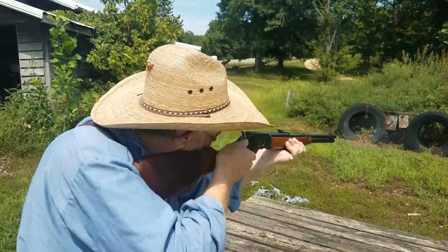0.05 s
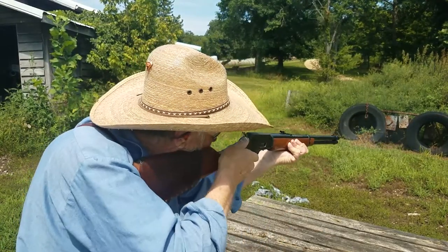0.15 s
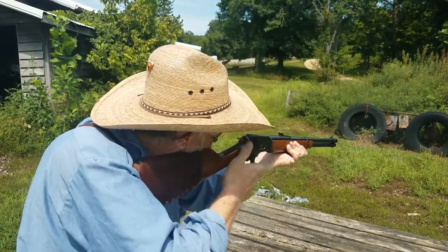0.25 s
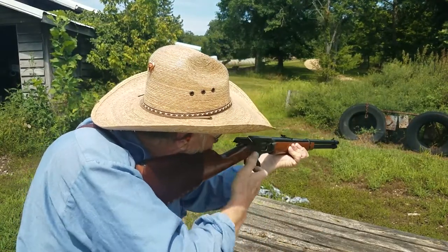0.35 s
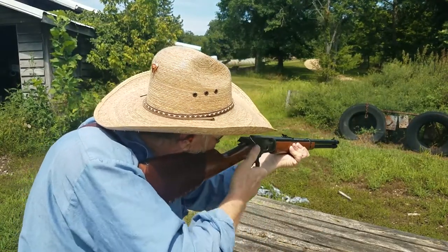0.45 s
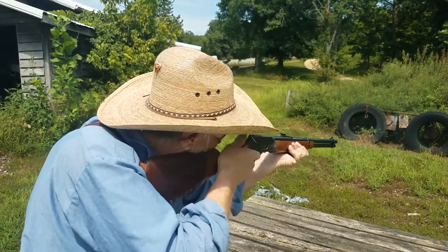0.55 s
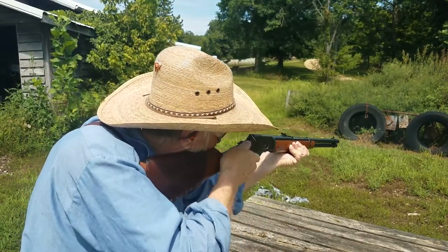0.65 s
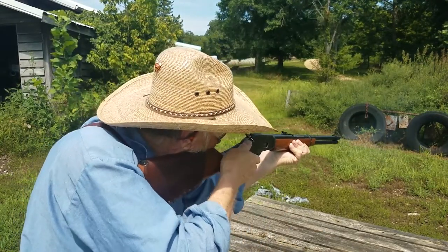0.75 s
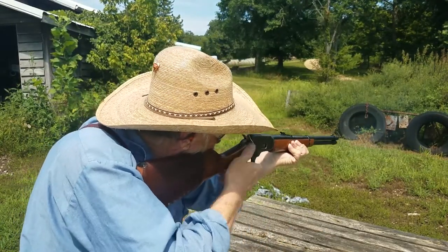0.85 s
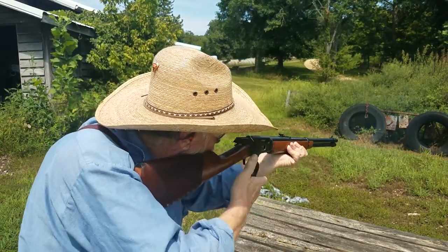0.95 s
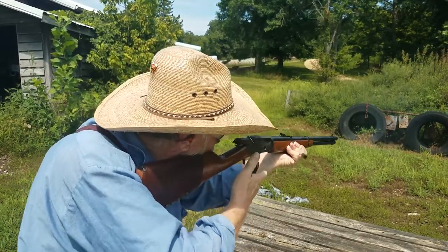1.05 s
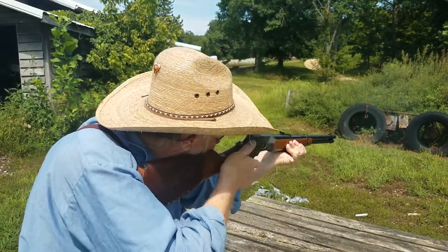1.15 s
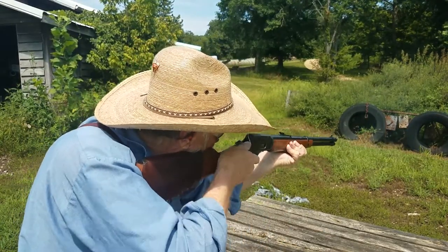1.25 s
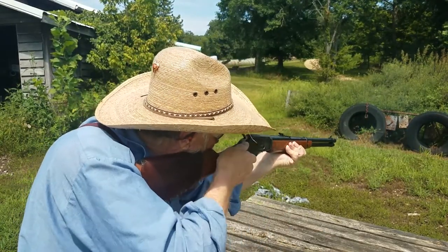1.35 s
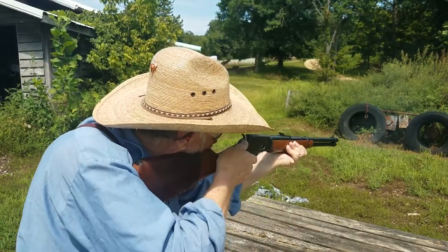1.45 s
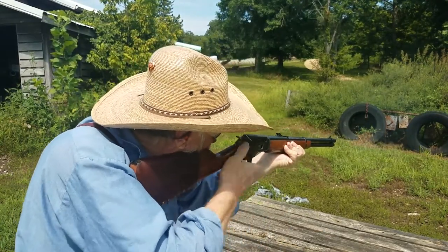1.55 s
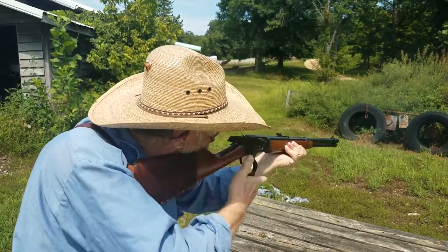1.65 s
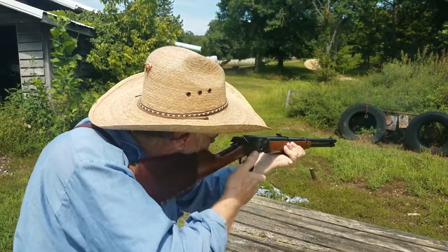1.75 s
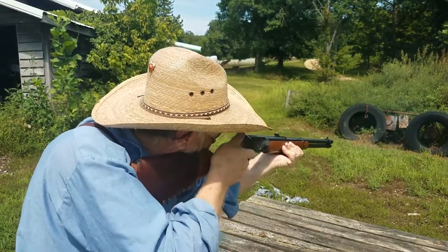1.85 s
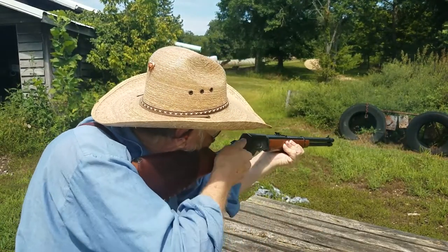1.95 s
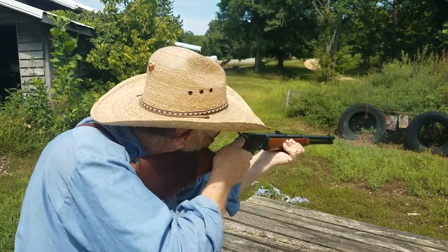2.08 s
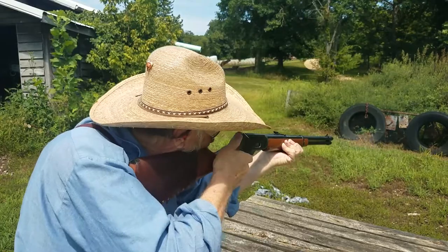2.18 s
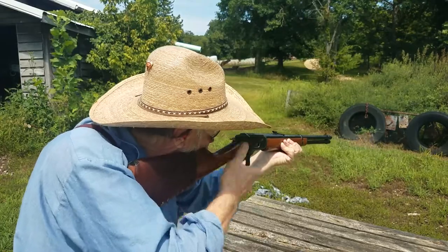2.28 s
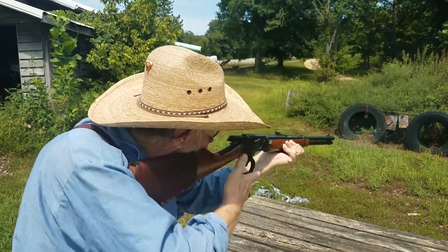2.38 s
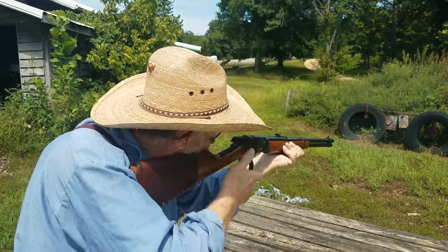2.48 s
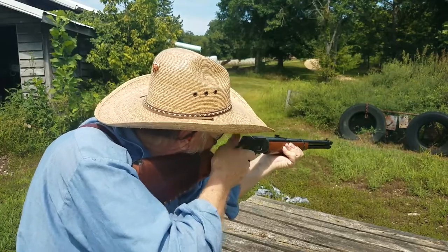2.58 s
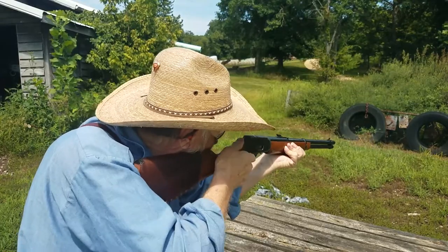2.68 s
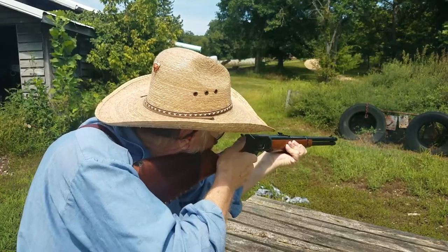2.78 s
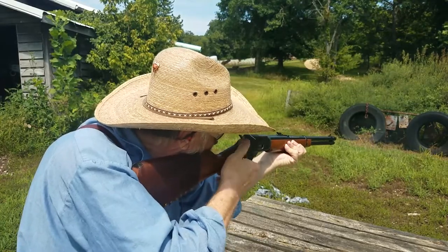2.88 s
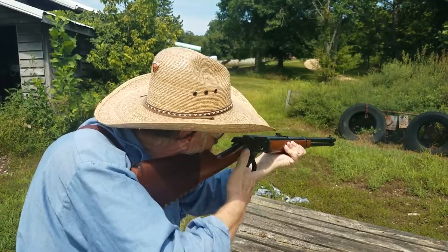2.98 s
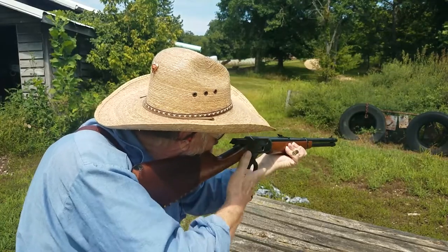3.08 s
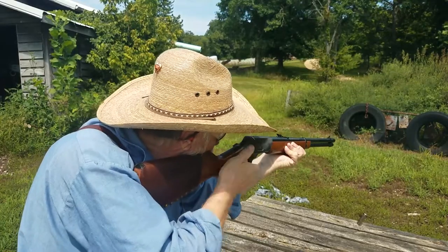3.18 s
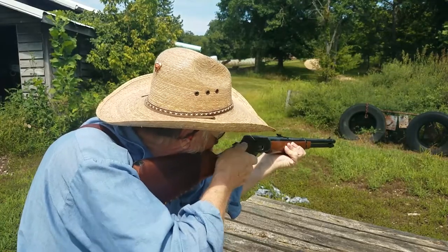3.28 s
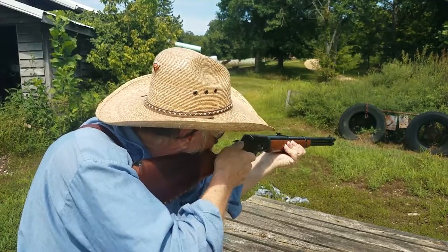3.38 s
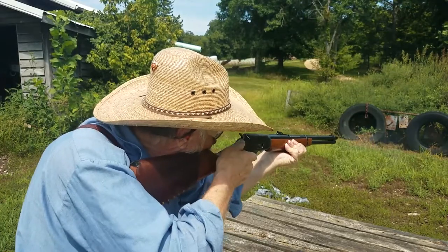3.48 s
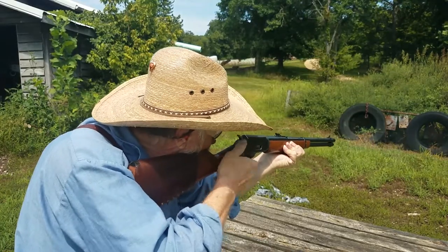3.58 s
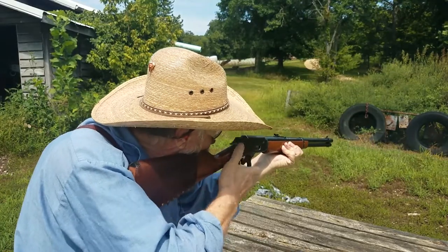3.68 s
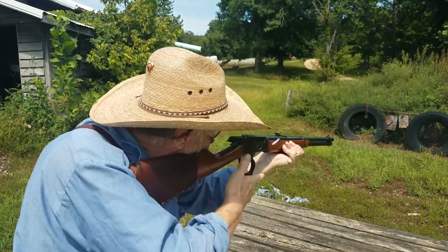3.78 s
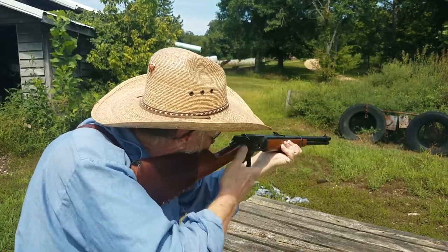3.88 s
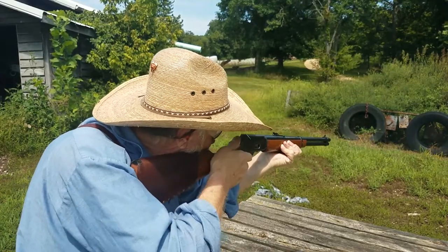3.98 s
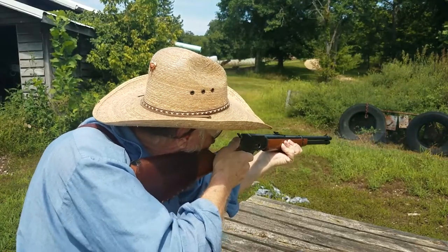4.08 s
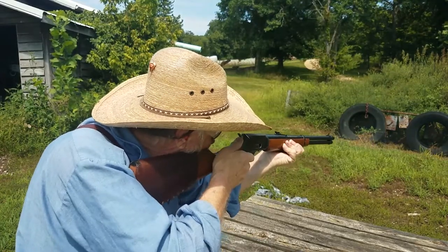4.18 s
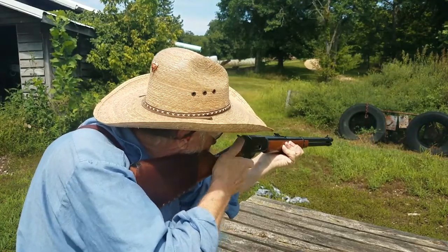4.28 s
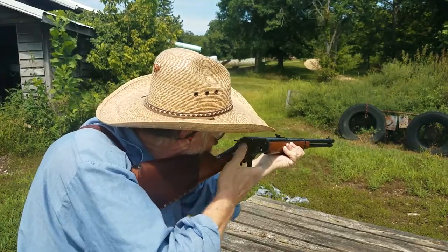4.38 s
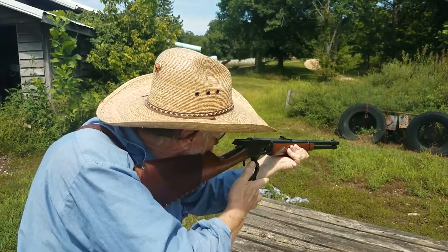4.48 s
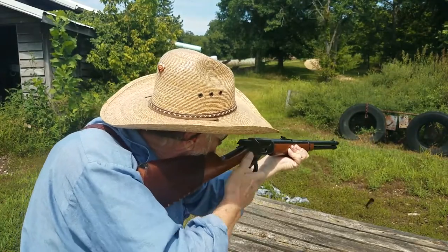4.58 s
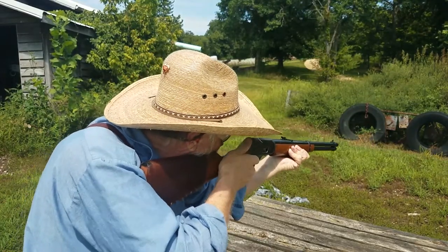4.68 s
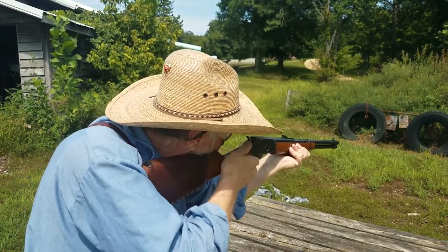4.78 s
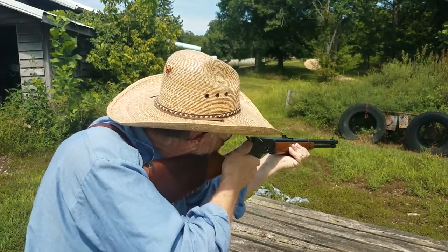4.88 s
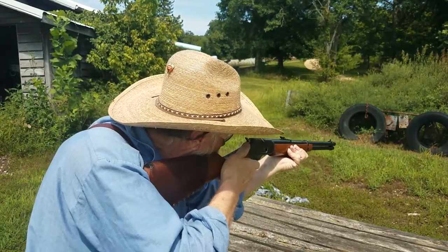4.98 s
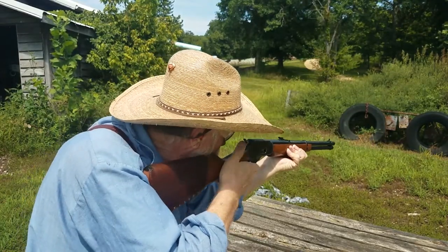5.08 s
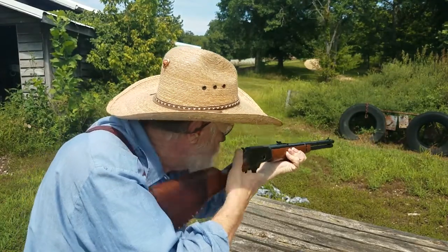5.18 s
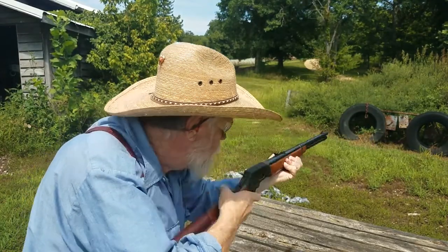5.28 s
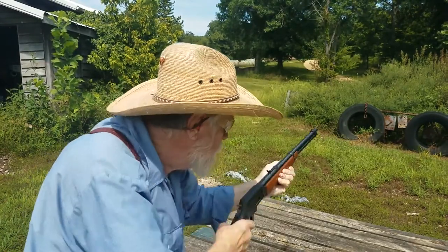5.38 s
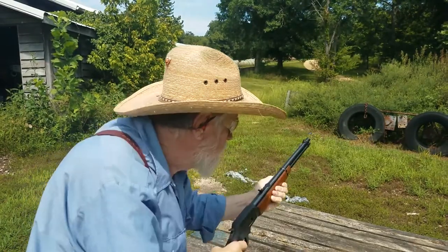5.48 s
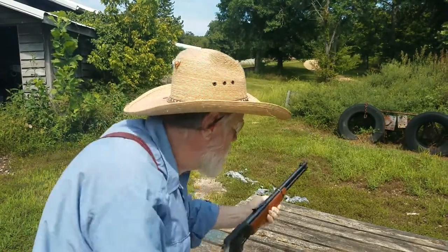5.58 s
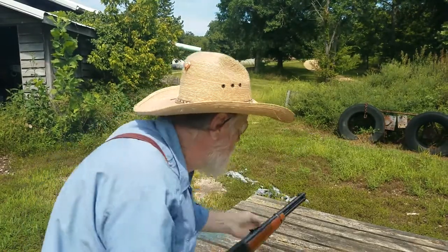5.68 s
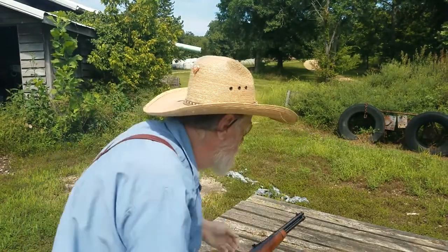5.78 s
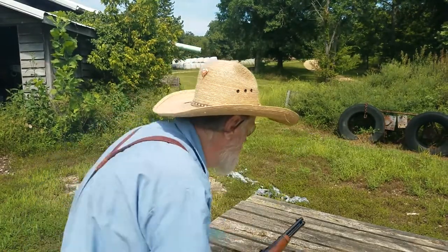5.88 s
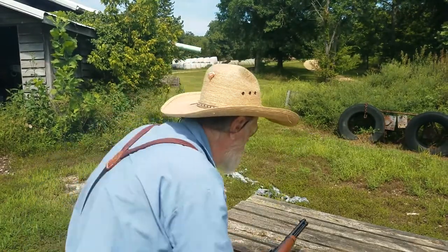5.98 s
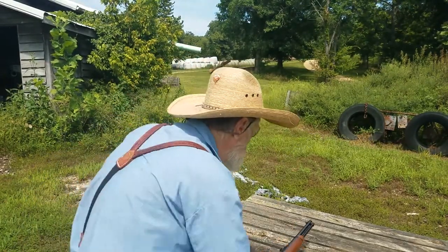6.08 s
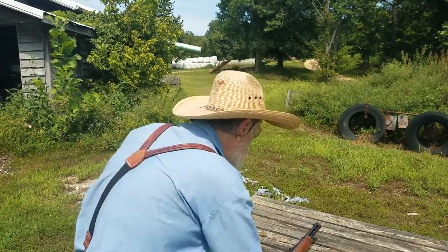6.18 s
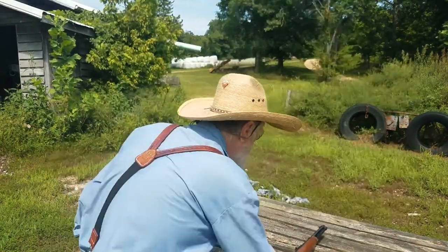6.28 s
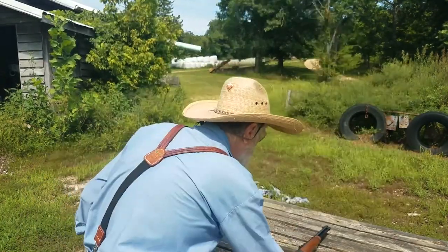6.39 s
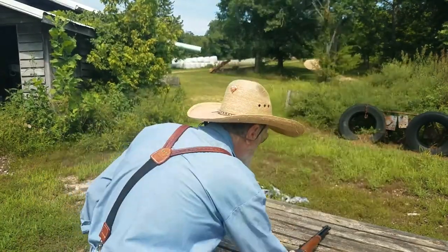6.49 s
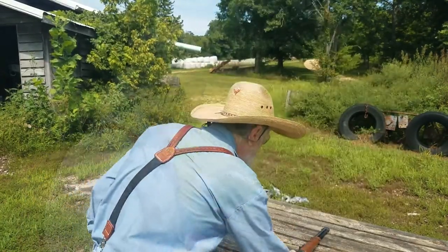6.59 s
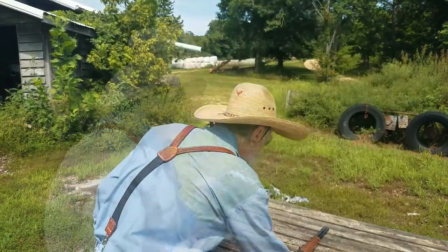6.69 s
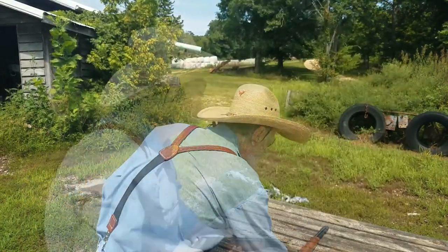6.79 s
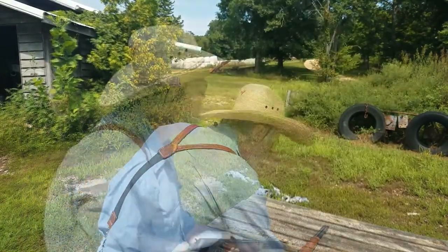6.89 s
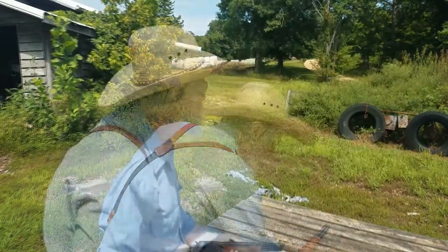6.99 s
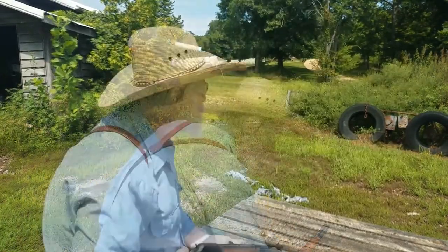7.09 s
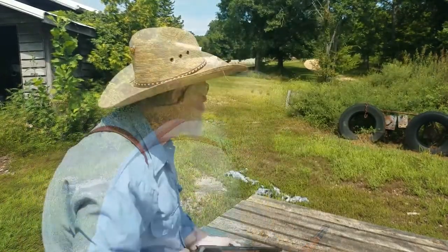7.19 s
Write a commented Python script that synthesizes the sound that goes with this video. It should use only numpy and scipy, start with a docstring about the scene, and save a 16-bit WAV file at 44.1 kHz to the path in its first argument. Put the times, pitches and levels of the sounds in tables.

```python
"""Lever-action rifle and steel plate

On a summer range seven shots strike a steel plate, then the hammer snaps on an empty chamber and
the rifle is laid on a table. Blasts, wall slaps and tree tails are decaying noise bands with low
pulses; plate and receiver are ringing modes; action contacts, insects and wind are shaped noise, the
far motor sines. Right port faces the scene, left is nearly covered; limiting and clipping act on both."""
import sys
import numpy as np
from scipy import signal
from scipy.fft import rfft, irfft, next_fast_len
from scipy.io import wavfile

SR = 44100
rng = np.random.default_rng(int(sys.argv[2]) if len(sys.argv) > 2 else 0)


def generate_wav(sig):
    """Save sig (samples, or channels by samples) to the path in sys.argv[1] as 16-bit PCM at SR."""
    pcm = np.round(np.clip(np.atleast_2d(sig).T, -1, 1) * 32767).astype(np.int16)
    wavfile.write(sys.argv[1], SR, pcm)


N = 319725


def amp(db):
    """Gain of a level in dB."""
    return 10 ** (np.asarray(db) / 20)


def at_hz(points, hz, axis=1):
    """Table column interpolated on a log-frequency axis."""
    points = np.array(points)
    return np.interp(np.log(hz), np.log(points[:, 0]), points[:, axis])


def coloured(x, points):
    """Filter by a (frequency [Hz], gain [dB]) curve."""
    size = next_fast_len(N)
    hz = np.arange(size // 2 + 1) * SR / size + 1
    return irfft(rfft(x, size) * amp(at_hz(points, hz)), size)[:N]


def noise(points):
    """Coloured noise of rms 1."""
    x = coloured(rng.standard_normal(N), points)
    return x / x.std()


def drift(rate_hz):
    """Random points of spread 1, rate_hz per second, joined by lines."""
    points = rng.standard_normal(int(N / SR * 400))
    return np.interp(np.arange(N) / SR * rate_hz, np.arange(len(points)), points)


def clicks(times_s, sizes):
    """Click train."""
    out = np.zeros(N) + 1e-18
    np.add.at(out, (np.asarray(times_s) * SR).astype(int), sizes)
    return out


def fall(x, t60_s):
    """Each click starts an exponential decay."""
    return signal.lfilter([1], [1, -amp(-60 / (t60_s * SR))], x)


def ring(x, hz, t60_s):
    """Two-pole resonator: a unit click starts a decaying sine of height 1."""
    r, w = amp(-60 / (t60_s * SR)), 2 * np.pi * hz / SR
    return signal.lfilter([0, np.sin(w)], [1, -2 * r * np.cos(w), r * r], x)


# Background rise after firing, sinking at the close: (time [s], relative level [dB])
RISE = [(4.68, -19), (4.78, -12), (4.9, -15), (5.25, -15), (5.6, -3), (5.8, -1.5), (6.9, -1.5), (7.1, -6.5),
        (7.25, -10)]
# Cicada, two swells: (time [s], relative level [dB])
SWELLS = [(4.68, -73), (4.9, -56), (5.45, -49), (5.94, -38.5), (6.1, -38.5), (6.3, -48), (6.46, -47.5),
          (6.8, -36), (6.94, -39), (7.1, -46)]
# Slow beats at the start of each swell: (first beat [s], beats [count], relative level [dB])
SWELL_STARTS = [(5.444, 4, -46), (6.39, 6, -38)]
# Cicada spectrum: (frequency [Hz], relative density [dB per Hz])
CICADA = [(5410, -33), (9200, -11), (9840, -16.5), (11000, -5.5), (12800, -3), (15100, 0), (16000, -4)]
# Motor harmonics: (frequency [Hz], relative level [dB])
MOTOR = [(145.3, 3.5), (290.7, -11.5), (436, -23), (581.4, -18.5)]
# Air noise: (time [s], relative level [dB])
AIR_LEVEL = [(4.7, -52), (5.5, -51.5), (6.9, -49), (7.05, -51.5)]
# Air spectrum: (frequency [Hz], relative density [dB per Hz])
AIR = [(88, -27.5), (150, -5.5), (368, -12.5), (1940, -24), (6510, -26.5), (7920, -16.5), (9630, -29.5),
       (12900, -14.5), (16000, -12.5)]
WIND_REL_DB, CRICKET_REL_DB, MOTOR_REL_DB = -47.5, -51, -49
HUM_WAVER_DB, BEAT_S = 3, .0495
RUSTLE_S, RUSTLE_WIDTH_S, RUSTLE_REL_DB = 7.03, 0.077, -54.5


def field():
    """Wind and air noise, motor harmonics, crickets as sliding tone bursts, cicada as pulsed noise."""
    time = np.arange(N) / SR
    rise = amp(np.interp(time, *np.transpose(RISE)))
    swell = amp(np.interp(time, *np.transpose(SWELLS)))

    gusts = noise([(20, -19.5), (50, -6.5), (120, -8.5), (300, -31), (1000, -46.5), (3000, -76)])
    gusts = gusts * amp(2.0 + 3.3 * drift(11))
    hum = sum(amp(db + HUM_WAVER_DB * drift(20)) * np.sin(2 * np.pi * hz * time) for hz, db in MOTOR)

    chirps = 0
    for rate_hz, db in ((55, 8.0), (82, -14)):
        turn = (rate_hz * time + 0.042 * drift(14)) % 1
        pitch_hz = 7950 - 1900 * (turn - .5)   # every chirp slides down
        stroke = np.exp(-((turn - .5) / .13) ** 2)
        tone = np.sin(2 * np.pi * np.cumsum(pitch_hz) / SR)
        chirps = chirps + amp(db + 3.5 * drift(24)) * stroke * tone
    chorus = noise([(6600, -24.0), (7400, -6.5), (8000, -2.5), (8600, -12.5), (9500, -42.5)])
    crickets = 1.3 * chirps + 0.91 * chorus

    beat_clicks = sum(clicks(s + BEAT_S * np.arange(round(count)), amp(db))
                      for s, count, db in SWELL_STARTS)
    beats = fall(beat_clicks, 0.046)
    pulsing = amp(2.5 * np.sin(2 * np.pi * 59 * time + drift(6)))
    cicada = noise(CICADA) * (swell * pulsing + beats)

    rustle_shape = np.exp(-((time - RUSTLE_S) / RUSTLE_WIDTH_S) ** 2)
    rustle = amp(RUSTLE_REL_DB + 2.4 * drift(70)) * rustle_shape
    rustle = rustle * noise([(1500, -15), (4000, -7), (5500, -1), (8000, -20)])
    air = amp(np.interp(time, *np.transpose(AIR_LEVEL))) * noise(AIR)

    risen = rise * (amp(WIND_REL_DB) * gusts + amp(MOTOR_REL_DB) * hum + amp(CRICKET_REL_DB) * crickets)
    return 2 * (risen + cicada + rustle + air)


# Shots and where each bullet lands: (time [s], plate clang delay [s], low thud delay [s],
# ring length factor [1], relative start levels of eight leading plate modes [dB] x 8)
SHOTS = [(0.0121, 0.063, .204, 1.01, -6, -3, -7.5, -10.5, -8.5, -8, -25, -5.5),
         (0.6615, 0.055, 0.18, .69, -18, -1.5, -9.5, -7.5, -10.5, -11, -11, 3),
         (1.3381, 0.057, 0.15, 0.75, -21, 1, -10, -8, -32, -8, -8, -23),
         (1.9911, 0.055, .187, 0.81, -19.5, 0.5, -19, -12.5, -10, -4, -19, -11),
         (2.681, .0578, .16, 0.69, -10.5, 1.6, -18.5, -12, -22.5, -22.5, -20, 4),
         (3.3789, 0.064, .243, 1.016, -13.5, 3.5, -18, -2, -12.5, -16, -7, -17),
         (4.0502, 0.062, 0.17, .79, -11.5, 3, -23, -24.5, -11, -3.5, -8.5, -22)]
# Blast repeats off table, ground, shed corner: (delay [s], relative level [dB])
BOUNCES = [(.0045, 0.5), (.009, -1.5), (.014, -5), (.017, -6)]
# Decaying noise of blast, bullet splash, trees:
# (frequency [Hz], relative start density [dB per Hz], t60 [s])
BLAST = [(60, -39, 0.04), (198, -32, 0.033), (700, -33.5, 0.035), (1520, -36.5, 0.046), (3720, -50, 0.044),
         (8352, -50, 0.053), (15000, -51.5, 0.074)]
SPLASH = [(60, -33.5, 0.06), (200, -29.5, 0.11), (690, -38, 0.078), (1460, -34, 0.084), (4000, -47.5, 0.14),
          (9310, -61, 0.38), (15000, -53, 0.39)]
TREES = [(60, -52.5, 0.44), (200, -58.5, 0.88), (750, -56, 2.53), (1390, -48.5, 1.31), (4000, -52.5, 0.93),
         (8600, -57, 0.89), (15000, -62, 0.29)]
WALL_S = .043   # shed wall slap after the shot


def gunfire():
    """Blast, wall slap, bullet splash, tree echoes: decaying 3/4-octave noise bands plus low pulses."""
    fire, clang, thud = np.transpose(SHOTS)[:3]
    muzzle = clicks(fire, 0.65)
    slap = clicks(fire + WALL_S, 0.35)
    hit = clicks(fire + clang, 0.88)
    blast = muzzle + sum(clicks(fire + after, amp(db)) for after, db in BOUNCES)

    bands, white, lumps = 0, rng.standard_normal((2, N)), drift(90)
    edges = 40 * 2. ** np.arange(0, 9.1, .75)
    for k, (low, high) in enumerate(zip(edges, edges[1:])):
        hz = np.sqrt(low * high)
        # single trunks answer in lumps
        lump_db = at_hz([(1500, 3.3), (6000, 1.5)], hz) * lumps + 0.99 * drift(55)
        level = amp(at_hz(TREES, hz)) * fall(muzzle, at_hz(TREES, hz, axis=2)) * amp(lump_db)
        for points, start in ((BLAST, blast), (SPLASH, hit)):
            level = level + amp(at_hz(points, hz)) * fall(start, at_hz(points, hz, axis=2))
        slap_t60_s = np.clip(hz / 17000.0, .035, .06)
        level = level + amp(at_hz(BLAST, hz) + 4.0) * fall(slap, slap_t60_s)
        band_filter = signal.butter(2, [low, high], "band", fs=SR, output="sos")
        band = signal.sosfilt(band_filter, white[k % 2])
        bands = bands + np.sqrt(SR / 2) * band * level

    # boarded wall returns a short pulse train
    boards = sum(clicks(fire + WALL_S + .00105 * k, 1) for k in range(4))
    boards = boards + clicks(fire + WALL_S + .0068, .6)
    slats = amp(5.5) * ring(boards, 950, 0.00091)
    wall_pulse = amp(7.5) * ring(signal.lfilter([.03], [1, -.97], slap), 140, 0.04)
    blast_pulses = amp(1.5) * ring(blast, 570, 0.013)   # one per blast and bounce
    # plate swings back against its stand
    swing_back = signal.lfilter([.015], [1, -.985], clicks(fire + thud, 0.94))
    boom = amp(-19) * ring(swing_back, 150, 0.091)
    hit_pulse = amp(1.0) * ring(hit, 150, 0.065)
    return bands + slats - wall_pulse + blast_pulses + boom - hit_pulse


def left_crack():
    """Left port's own path: short rings at the crack and wall slap, over two noise decays."""
    fire = np.array(SHOTS)[:, 0]
    first, main = clicks(fire + .001, 1), clicks(fire + .0047, 1)
    wall = clicks(fire + WALL_S + 0.0017, 1)
    rings = amp(-8.5) * ring(wall, 1100, 0.0077)
    rings = rings + amp(1.5) * ring(main, 2900, 0.0048) + amp(-2.0) * ring(first, 2200, 0.00093)
    decays = amp(-2.0) * fall(main, 0.038) + amp(-31.5) * fall(clicks(fire, 0.9), 0.42)
    spectrum = [(60, -18.5), (200, -14), (1200, -0.5), (4000, -5.5), (8000, -23.0), (13000, -15.5)]
    return rings + decays * noise(spectrum)


# Plate modes: (frequency [Hz], t60 at ring length factor 1 [s])
PLATE = [(861, .3), (1850, .5), (2080, .8), (2390, .4), (3366, .28), (4241, .33), (4548, .28), (5902, .24),
         (6255, .22), (7221, .17), (8450, .22), (11180, .18), (1707, .22), (2864, .25), (3050, .22),
         (3934, .24), (4810, .2), (6295, .25), (8285, .2), (8660, .14), (8900, .17), (9172, .17),
         (9880, .12), (10470, .18), (10905, .2), (11570, .16), (11990, .18), (12160, .2), (14050, .2),
         (14770, .17)]
# Rows of the leading modes in PLATE: (row [index])
LEADING = [0, 1, 2, 4, 5, 6, 7, 8]
# Usual start of the other modes in PLATE order, before scatter: (relative level [dB])
OTHER_DB = [-16, -10.5, -11.5, -16.5, -8.5, -16.5, -17.5, -14, -15.5, -15.5, -13, -16.5, -16.5, -16.5,
            -17.5, -18, -16.5, -14.5, -14, -16.5, -16.5, -17]
SCATTER_DB = 5.0


def plate():
    """Struck plate modes: uneven build-up, each wavers irregularly in level; start of the others by chance."""
    out, time = np.zeros(N), np.arange(SR) / SR
    hz, t60_s = np.transpose(PLATE)[:, :, None]
    luck = rng.standard_normal((len(SHOTS), 3, len(PLATE), 1))
    waver_db = [at_hz([(2100, 1.5), (4000, 3.5)], mode_hz) * drift(40) for mode_hz, _ in PLATE]
    waver = amp(np.array(waver_db))
    others = np.delete(np.arange(len(PLATE)), LEADING)
    for (fire, clang, _, lasting, *leading_db), (strength, rise, phase) in zip(SHOTS, luck):
        start_db = SCATTER_DB * strength
        start_db[others, 0] += OTHER_DB
        start_db[LEADING, 0] = leading_db
        build = 1 - np.exp(-time / (0.0053 * amp(4.4 * rise)))
        decay = amp(start_db - 60 * time / (lasting * t60_s))
        modes = decay * build * np.sin(2 * np.pi * hz * time + 3 * phase)
        i = int((fire + clang) * SR)
        out[i:i + SR] += np.sum(modes * waver[:, i:i + SR], axis=0)
    return out


GRIT_MAX_DB, GRIT_T60_S, GRIT_SPREAD_S = -13, 0.077, .04


def grit():
    """Gritty edge of the plate strike: forty short tones per strike at chance pitches and moments."""
    out, time = np.zeros(N), np.arange(SR // 4) / SR
    luck = rng.random((len(SHOTS), 3, 40, 1))
    for (fire, clang, *_), (pitch, late, size) in zip(SHOTS, luck):
        since = time - GRIT_SPREAD_S * late
        decay = amp(GRIT_MAX_DB - 14 * size - 60 * np.maximum(since, 0) / GRIT_T60_S) * (since > 0)
        tones = decay * np.sin(2 * np.pi * 2300 * 5.5 ** pitch * since)
        i = int((fire + clang) * SR)
        out[i:i + len(time)] += tones.sum(axis=0)
    return out


# Lever and bolt contacts: (time [s], relative body level [dB], treble over body [dB])
ACTION = [(0.311, -17.5, 2), (.4193, -34, -8), (0.4405, -25.5, 2), (0.4697, -27, -1), (0.48, -26.5, -5),
          (0.4952, -21, 4), (0.5054, -19.5, 3), (.524, -15.5, 4), (0.9565, -20.5, 1.5), (1.064, -34, -10),
          (1.08, -27, 1.5), (1.1, -29, 2.5), (1.118, -23.5, -2), (1.15, -26, 6), (1.1652, -20.5, 6),
          (1.637, -28, 4), (1.7224, -33, 3), (1.7376, -25, 3.5), (1.7744, -24, -14), (1.7947, -27, 1),
          (1.822, -18, 1.5), (1.8363, -19.5, 7), (2.289, -48, 17), (2.3345, -22, -1.5), (2.4526, -36, -9),
          (2.4671, -22, -1), (2.488, -21, 3), (2.5023, -25, -4), (2.5218, -18.5, -3), (2.5346, -25, 1),
          (2.5487, -20.5, 8), (2.9507, -42, 13), (2.9967, -23, 4), (3.123, -27.5, 2), (3.1437, -26.5, -1),
          (3.158, -25, -5), (3.1745, -25, 7), (3.1915, -25, 3), (3.2023, -29.5, 15), (3.727, -15.5, 2),
          (3.8401, -37, 9), (3.8544, -16, 1), (3.885, -27, -1), (3.905, -27, 1.5), (3.923, -25.5, 1.5),
          (3.943, -40, -5), (4.431, -12, 1.5), (4.4417, -46, 15), (4.5407, -36, 2), (4.5623, -36, 9),
          (4.5966, -25, 0), (4.6216, -27, 2), (4.637, -24.5, 3), (4.6541, -51, 1), (4.78, -38, 7),
          (4.8216, -35, -6), (4.915, -40, -3), (4.9344, -31.5, 4.5), (5.062, -34, -1.5), (5.2634, -28, 4)]
# Bolt slides: (start [s], end [s], relative level [dB])
SLIDES = [(0.41, 0.527, -45.5), (1.063, 1.181, -40), (1.753, 1.792, -36), (2.453, 2.571, -41.5),
          (3.119, 3.209, -41.5), (3.869, 3.902, -36.5), (4.57, 4.649, -59)]
# Receiver modes: (frequency [Hz], level re contact [dB], t60 [s])
RECEIVER = [(1287, -7.5, 0.033), (1960, -5.5, 0.016), (2407, -18.5, 0.022)]
# Faint metallic rings, spent brass, small metal, plate still sounding:
# (time [s], frequency [Hz], level [dB], t60 [s])
PINGS = [(1.066, 13800, -29, 0.14), (2.35, 6100, -36, 0.072), (2.388, 13800, -32.5, 0.22),
         (2.47, 13500, -27, 0.074), (3.845, 13600, -42, 0.14), (4.432, 6250, -34, 0.11),
         (4.752, 12900, -32.5, 0.25), (4.825, 1860, -34, 0.29), (5.433, 1845, -53, .5),
         (6.365, 1970, -43, 0.087)]
FIRM_T60_S, FIRM_DB, LOOSER_DB_PER_DB = .024, -16, 0.52   # lighter contacts rattle longer
TRIGGER_LEAD_S, TRIGGER_DB, TRIGGER_BRIGHT_DB, TRIGGER_T60_S = .0122, -30.5, 2, .015
SNAP_S, SNAP_DB, SNAP_BRIGHT_DB, SNAP_T60_S = 4.7512, -6, 4, 0.022   # hammer on empty chamber


def action():
    """Steel on steel: treble and body noise bursts that ring the receiver; slides, faint metallic rings."""
    bright = noise([(1500, -40.5), (3000, 1.0), (7000, 2.5), (10000, -3.0), (15000, 0.5)])
    body = noise([(200, -36.5), (700, -11.5), (1200, 2), (2500, 3.5), (5000, -25.0)])
    high, low, time = np.zeros(N), np.zeros(N), np.arange(SR // 8) / SR

    rows = []
    for s, db, bright_db in ACTION:
        looser_db = LOOSER_DB_PER_DB * (FIRM_DB - db - max(bright_db, 0))
        rows.append((s, db, bright_db, FIRM_T60_S * amp(looser_db)))
    # hammer release before shots two to seven and the snap
    for s in [shot[0] for shot in SHOTS[1:]] + [SNAP_S]:
        rows.append((s - TRIGGER_LEAD_S, TRIGGER_DB, TRIGGER_BRIGHT_DB, TRIGGER_T60_S))
    rows.append((SNAP_S, SNAP_DB, SNAP_BRIGHT_DB, SNAP_T60_S))
    rows = np.array(rows)

    for s, db, bright_db, t60_s in rows:
        i = int(s * SR)
        shape = amp(-60 * time / t60_s) * np.minimum(time / 0.0013, 1)
        high[i:i + len(time)] += amp(db + bright_db) * shape
        low[i:i + len(time)] += amp(db) * shape

    scrape = amp(8.1 * drift(220))   # sliding catches and slips
    for start, end, db in SLIDES:
        stroke = slice(int(start * SR), int(end * SR))
        high[stroke] += amp(db) * scrape[stroke]
        low[stroke] += amp(db - 4.0) * scrape[stroke]

    luck = rng.standard_normal((len(rows), len(RECEIVER)))
    modes = sum(ring(clicks(rows[:, 0], amp(rows[:, 1] + db + 1.1 * luck[:, k])), hz, t60_s)
                for k, (hz, db, t60_s) in enumerate(RECEIVER))
    jolt = -amp(1.2) * ring(clicks([SNAP_S], 1), 130, 0.013)   # snap jolts the whole rifle
    pings = sum(ring(clicks([s], amp(db)), hz, t60_s) for s, hz, db, t60_s in PINGS)
    return high * bright + low * body + modes + jolt + pings


# Rifle on wood: (time [s], relative knock level [dB], relative click level [dB])
KNOCKS = [(4.965, -40.5, -41), (6.579, -26.5, -38), (6.585, -27.5, -27.5), (6.796, -41, -57),
          (6.916, -25, -39), (6.925, -20, -16)]
# Board modes: (frequency [Hz], relative level [dB], t60 before the 0.15 s cap [s])
BOARDS = [(136, -22, 0.23), (214.5, -4, 0.137), (447, -6.5, 0.53), (668, -18, 0.07), (783, -26, 0.092),
          (1040, -29, 0.1)]


def wooden_table():
    """Wooden knocks: softened impacts ring board modes, with a dull rattle and a short click."""
    s, knock_db, click_db = np.transpose(KNOCKS)
    soft = signal.lfilter([.3], [1, -.7], clicks(s, amp(knock_db)))
    modes = sum(amp(db - 3.5) * ring(soft, hz, min(t60_s, .15)) for hz, db, t60_s in BOARDS)
    rattle = fall(clicks(s, amp(knock_db - 7.5)), 0.15)
    rattle = rattle * noise([(100, -13), (250, -6.5), (750, -6.5), (1000, -18.0), (4000, -30.5)])
    tick = signal.lfilter([.012], [1, -.988], fall(clicks(s, amp(click_db + 5)), 0.016))
    tick = tick * noise([(500, 10.5), (2000, 4.5), (2900, 7.5), (4000, -9.5), (9000, -14), (15000, -28)])
    return 2 * (modes + rattle + tick)


# Left port against right: (frequency [Hz], gain [dB])
COVERED = [(60, -22.5), (110, -28.5), (200, -21.5), (380, -22.5), (700, -19.5), (1290, -20.5), (2380, -16),
           (4400, -23), (8120, -33.5), (15000, -23.5)]
# Left port's own wind and floor: (frequency [Hz], density [dB per Hz])
LEFT_HISS = [(30, -85.5), (150, -94.5), (1000, -108), (4000, -118), (15000, -125)]


def scene():
    """Right port: direct sum. Covered left: filtered, near sounds 12 samples late, plus crack and hiss."""
    far = field()
    near = gunfire() + plate() + grit() + action() + wooden_table()
    left_far = coloured(far, [(40, -6.5), (150, 6.5), (3000, 6.5), (8000, 0), (15000, -8.0)])
    left = coloured(np.roll(near, 12) + left_far, COVERED)
    hiss = coloured(rng.standard_normal(N), LEFT_HISS) * np.sqrt(SR / 2)
    return np.array([left + left_crack() + hiss, near + far])


RELEASE_DB_PER_S, THRESHOLD_DB, CUTOFF_HZ = 260, 2.5, 16500


def record(dry):
    """Quick-release limiter steered by the right port, deep-bass cut, hard clipping, top cut."""
    climb_db = RELEASE_DB_PER_S * np.arange(N) / SR
    over_db = np.maximum(20 * np.log10(np.abs(dry[1]) + 1e-9) - THRESHOLD_DB, 0)
    held_db = np.maximum.accumulate(over_db + climb_db) - climb_db
    limited = dry * amp(-signal.lfilter([.03], [1, -.97], held_db))
    limited = signal.lfilter(*signal.butter(2, 30, "high", fs=SR), limited)
    clipped = np.clip(limited, -.93, .93)
    top_cut = signal.cheby2(22, 60, CUTOFF_HZ, fs=SR, output="sos")
    return np.clip(signal.sosfilt(top_cut, clipped), -1, 1)


dry = scene()
out = record(dry)
generate_wav(out)
```